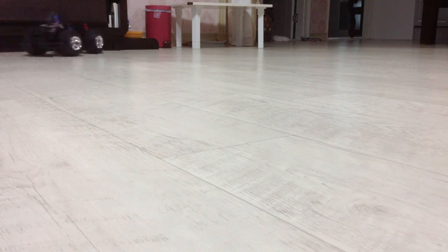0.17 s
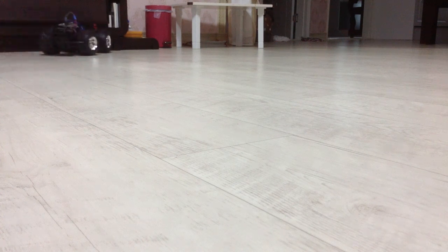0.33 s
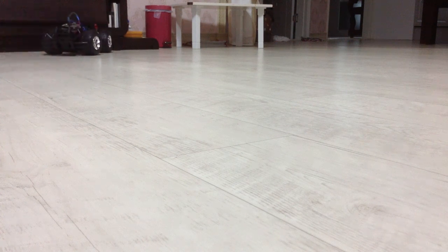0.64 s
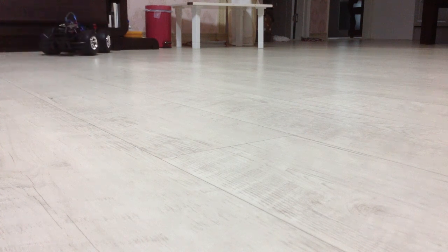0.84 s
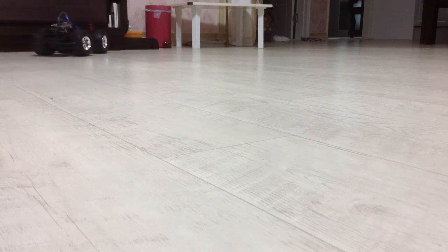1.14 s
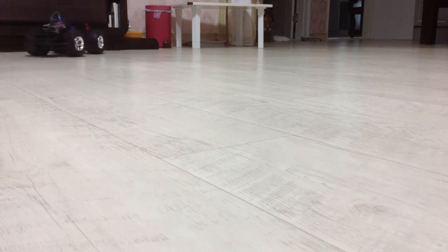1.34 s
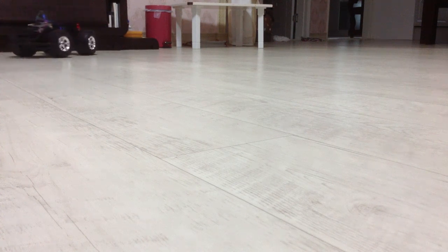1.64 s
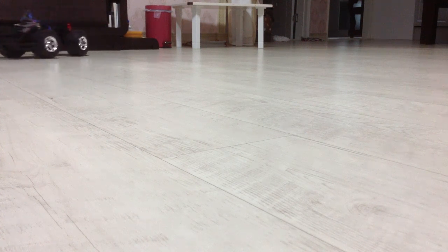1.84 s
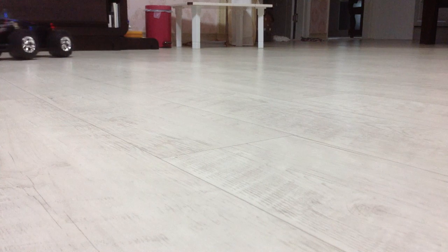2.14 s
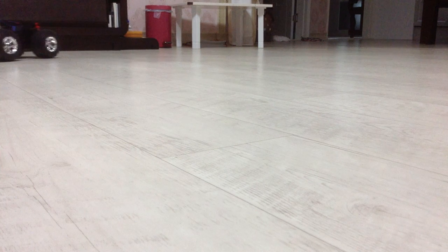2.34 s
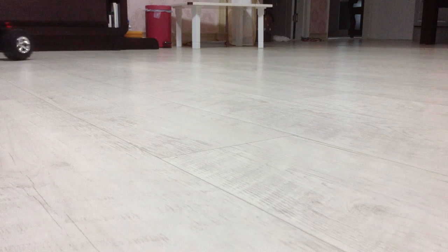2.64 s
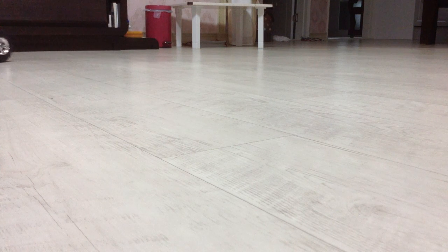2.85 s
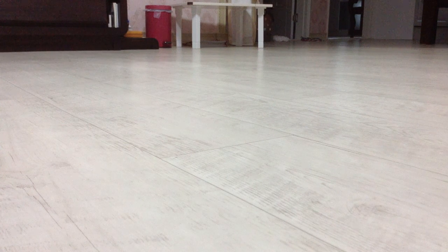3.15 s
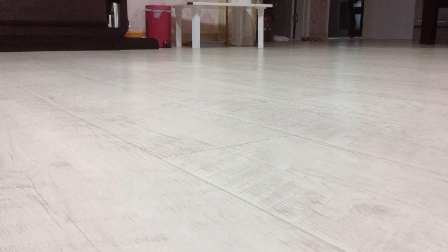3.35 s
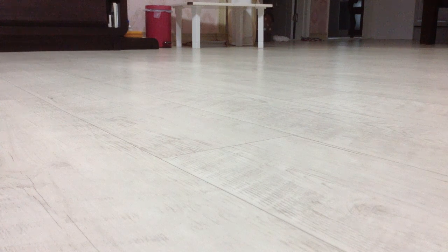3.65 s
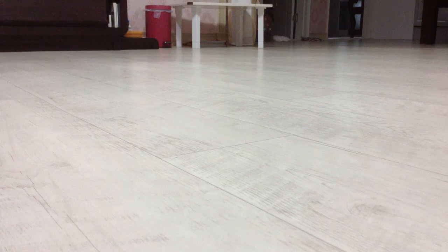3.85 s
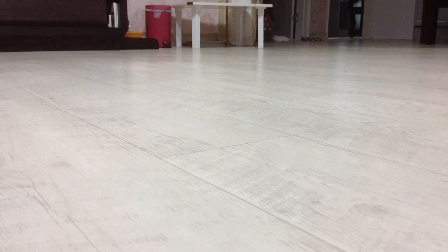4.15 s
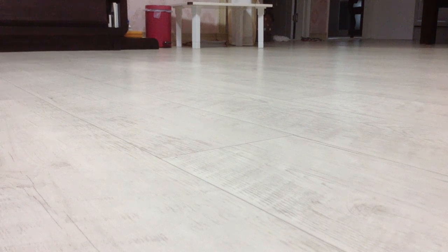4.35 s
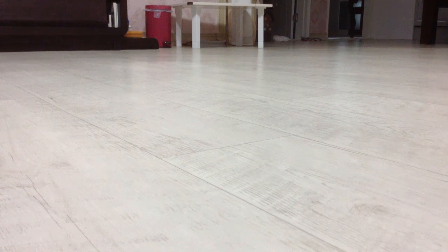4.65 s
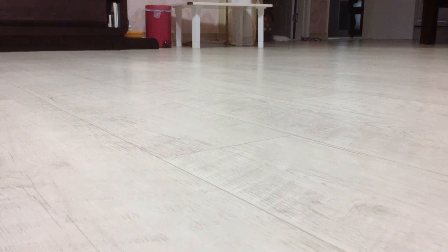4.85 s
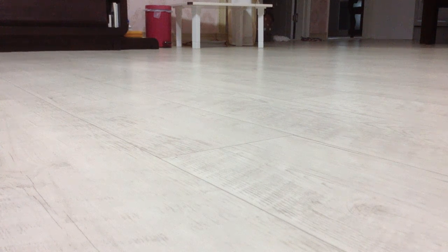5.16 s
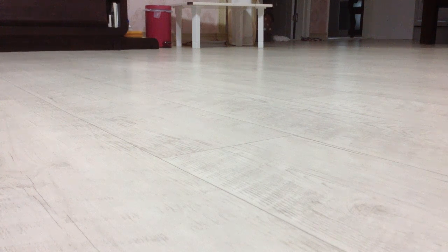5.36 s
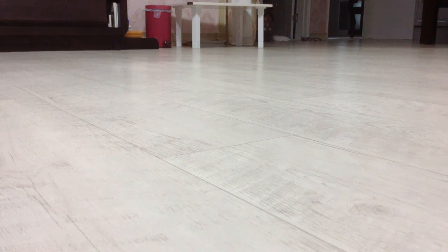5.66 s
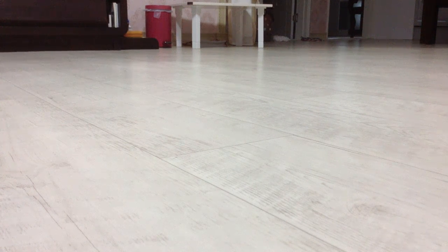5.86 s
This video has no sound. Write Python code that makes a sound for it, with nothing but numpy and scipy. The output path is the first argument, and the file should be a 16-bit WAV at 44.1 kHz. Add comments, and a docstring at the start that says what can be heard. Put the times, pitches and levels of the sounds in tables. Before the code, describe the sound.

Indoors on a hard floor, a little electric motor buzzes, bangs sharply, whirrs slowly upward with ticking gears, clacks to a halt, then faintly creeps.

```python
"""Plastic gears whirr and tick as a small radio-controlled car drives on laminate in a bare living room.
It bumps hard into furniture, jerks, creeps off and speeds up, stops with a clack and creeps off again.
Gears are uneven tooth contacts through resonances and colour filters; whines are wavering sines.
Blows are scattered clicks that ring chassis, shell and panels; soft hum and hiss are coloured noise.
Dense decaying echoes give the room."""
import sys
import numpy as np
from scipy import signal
from scipy.fft import rfft, irfft, next_fast_len
from scipy.io import wavfile

SR = 44100
rng = np.random.default_rng(int(sys.argv[2]) if len(sys.argv) > 2 else 0)


def wav_record(signal):
    """Record a signal, one row per channel, as 16-bit PCM in the file named by sys.argv[1]."""
    frames = np.transpose(np.atleast_2d(signal))
    bounded = np.clip(frames, -1, 1)
    # unit amplitude maps onto the largest positive 16-bit level
    quanta = np.round(bounded * 32767).astype(np.int16)
    wavfile.write(sys.argv[1], SR, quanta)


N = 265041
TIME_S = np.arange(N) / SR

# motor runs: start t/s, end t/s, starting speed/share of full, gain/share per s, extra rasp/dB
MOTOR_RUNS = [(0, 0.31, 0.8, 0.0049, -0.5), (.664, 0.72, .2, 4.57, 14.5), (.72, 4.325, .085, .31, 0),
              (4.98, 7.67, 0.072, .15, 9)]
# motor surges: t/s, extra speed before envelope/share of full, brush flare gain before envelope/dB
MOTOR_SURGES = [(.695, 0.001, -62), (1.253, 0.031, -75), (1.433, 0.031, -61), (1.675, 0.026, -76),
                (1.924, 0.056, -63), (2.28, .02, -58), (2.49, 0.09, -63), (3.16, .15, -48.5),
                (5.1, 0.01, -67), (5.16, 0.01, -65), (5.38, .01, -70), (5.54, 0.052, -66),
                (5.9, 0.029, -65)]
# bumps, rebounds, jolts: t/s, blow gain/dB, hardness low-pass f/Hz, lightness high-pass f/Hz,
# joint scatter/s, struck panel f/Hz, panel clack gain/dB
BLOWS = [(.3070, -26, 3960, 298, 0.00086, 910, -19), (0.3123, -11, 9000, 130, 0.00078, 1930, -19.5),
         (.3150, -10, 3570, 130, 0.0013, 558, -16), (.3265, -16, 1780, 130, 0.00059, 1360, -12.5),
         (.338, -26, 4000, 150, 0.0015, 2260, -21), (0.3797, -30, 1500, 130, 0.00064, 1230, -18.5),
         (.384, -32, 9000, 400, 0.00057, 2870, -26), (.407, -29, 5000, 200, .0007, 2290, -25.5),
         (.423, -31, 700, 130, .001, 550, -29.5), (.6065, -34, 2500, 600, 0.0005, 1320, -44),
         (.611, -35, 2200, 700, 0.0003, 2080, -31.5), (.622, -34.5, 1800, 202, .0007, 1260, -38),
         (.678, -33, 1010, 650, 0.00084, 766, -29), (.7002, -25.5, 1600, 650, 0.00038, 1730, -26.5),
         (.7080, -23.5, 1000, 550, 0.00067, 693, -25.5), (0.7113, -36, 2500, 500, 0.00044, 1530, -28.5),
         (.729, -27.5, 1200, 350, 0.0012, 594, -29.5), (.741, -32.5, 1510, 400, .001, 720, -39),
         (0.768, -40, 1500, 450, 0.0008, 644, -34.5), (.814, -46, 900, 450, 0.00075, 640, -40),
         (4.3448, -31, 3002, 401.8, 0.00035, 2370, -35), (4.3480, -36, 3005, 400, 0.00031, 2200, -31),
         (4.3510, -26.5, 5960, 300, .00025, 4500, -27.5), (4.364, -33.5, 12000, 300, 0.0014, 3420, -47),
         (4.383, -32, 12020, 300, .002, 2800, -45), (4.511, -40.5, 1207, 400.3, .001, 1900, -53)]
# spectrum of rasping teeth: f/Hz, relative level/dB
RASP_SPECTRUM = [(900, -10), (1700, -13.5), (2100, -1.5), (2400, -1.5), (2750, 3), (3150, -4), (3650, 2.5),
                 (4000, -2.5), (4350, -5.5), (4900, -11), (5900, -9), (7200, -16), (9500, -14.5),
                 (14000, -16.5)]

SURGE_ATTACK_S = 0.015  # shared by extra speed and brush flare


def from_db(db):
    """Decibels to amplitude gain."""
    return 10 ** (np.asarray(db) / 20)


def rms_one(x):
    """Scale to unit power."""
    return x / np.sqrt(np.mean(x ** 2) + 1e-20)


def during(start_s, end_s, fade_s):
    """One from start to end, linear fades outside."""
    inside_s = np.minimum(TIME_S - start_s, end_s - TIME_S)
    return np.clip(1 + inside_s / fade_s, 0, 1)


def after(start_s, attack_s, decay_s):
    """Exponential rise from a given moment, times exponential decay."""
    age_s = np.maximum(TIME_S - start_s, 0)
    return (1 - np.exp(-age_s / attack_s)) * np.exp(-age_s / decay_s)


def at_hz(points, hz):
    """Interpolate a table on a log-frequency axis."""
    f, value = np.transpose(points)
    return np.interp(np.log(np.maximum(hz, 1)), np.log(f), value)


def drift(rate_hz):
    """Unit-power random wander, rolled off smoothly above rate_hz."""
    size = next_fast_len(N, True)
    hz = np.fft.rfftfreq(size, 1 / SR)
    spectrum = rfft(rng.standard_normal(size)) / (1 + (hz / rate_hz) ** 2)
    return rms_one(irfft(spectrum, size)[:N])


def low_cut(x, hz, order=2):
    """Butterworth high-pass: take the bass away."""
    sos = signal.butter(order, hz, "high", fs=SR, output="sos")
    return signal.sosfilt(sos, x + 1e-18)


def colour(x, spectrum, size=4096):
    """Causal minimum-phase filter of unit energy with the given spectrum."""
    gain = from_db(at_hz(spectrum, np.fft.rfftfreq(size, 1 / SR)))
    cepstrum = irfft(np.log(gain))
    # fold the cepstrum onto positive time
    cepstrum[1:size // 2] *= 2
    cepstrum[size // 2 + 1:] = 0
    response = irfft(np.exp(rfft(cepstrum)))
    return signal.oaconvolve(x, response / np.linalg.norm(response))[:N]


def resonate(x, modes):
    """A hollow plastic body: parallel resonances of alternating sign."""
    out = 0
    for k, (hz, width_hz, db) in enumerate(modes):
        r = np.exp(-np.pi * width_hz / SR)
        poles = [1, -2 * r * np.cos(2 * np.pi * hz / SR), r * r]
        mode = (1 - r * r) / 2 * signal.lfilter([1, 0, -1], poles, x + 1e-18)
        out = out + (-1) ** k * from_db(db) * mode
    return out


def struck(hz, t60_s):
    """Half a second of one exponentially dying mode."""
    t = np.arange(SR // 2) / SR
    return np.sin(2 * np.pi * hz * t) * np.exp(-np.log(1000) * t / t60_s)


def contact(start_s, scatter_s, count=5):
    """A sharp touch, scattered in time by the joints of the plastic body: an all-pass chain."""
    click = signal.unit_impulse(SR // 10)
    for lag in rng.uniform(.1, 1, count) * scatter_s * SR:
        loop = np.r_[1, np.zeros(int(lag)), .6 * rng.choice([-1, 1])]
        click = signal.lfilter(loop[::-1], loop, click + 1e-18)
    return np.pad(click, (round(start_s * SR), N))[:N]


def teeth(per_s, jitter, uneven_db, rub):
    """Unevenly spaced tooth contacts of uneven force, with sliding noise between; unit power."""
    turns = np.cumsum(per_s * np.exp(jitter * drift(150))) / SR
    contacts = np.diff(np.floor(turns), prepend=0) * rng.choice([-1, 1], N)
    force = from_db(uneven_db * np.clip(rng.standard_normal(N), -2, 2))
    hits = rms_one(contacts * force / np.sqrt(per_s))
    return rms_one(hits + rub * rng.standard_normal(N))


def ambience():
    """Soft hum and hiss of the room: steady coloured noise."""
    # room noise spectrum: f/Hz, relative level/dB
    hum_hiss = [(25, -41), (62, -35), (80, -15), (120, -14), (175, 2), (260, 1.5), (370, -4.5), (700, -4.5),
                (1100, -11.5), (2500, -20.5), (4000, -16), (6200, -14), (9500, -24), (15000, -29)]
    return from_db(-56) * colour(rng.standard_normal(N), hum_hiss)


def reflections(build_s):
    """One second of dense echoes, each band with its own decay, bass shortest; unit energy."""
    # reverberation: f/Hz, t60/s
    decay_times = [(150, 0.26), (600, 0.57), (2000, 0.49), (6000, 0.46), (14000, 0.52)]
    t, hz = np.arange(SR) / SR, np.fft.rfftfreq(SR, 1 / SR)
    white, tail = rfft(rng.standard_normal(SR)), 0
    edges_hz = np.geomspace(40, SR / 2, 10)
    for low, high in zip(edges_hz, edges_hz[1:]):
        t60_s = at_hz(decay_times, np.sqrt(low * high))
        band = irfft(white * (hz >= low) * (hz < high), SR)
        tail = tail + band * np.exp(-np.log(1000) * t / t60_s)
    tail *= 1 - np.exp(-t / build_s)
    return tail / np.linalg.norm(tail)


def room(x, wet_db, build_s=0.0013, shift_hz=14.0, count=5):
    """Direct sound plus reflections whose pattern keeps shifting: a moving mix of echo tails."""
    pace, start = rng.random((2, count, 1))
    shares = np.cos(2 * np.pi * (shift_hz * pace * TIME_S + start))
    shares /= np.linalg.norm(shares, axis=0)
    echoes = sum(signal.oaconvolve(x * share, reflections(build_s))[:N] for share in shares)
    wet = from_db(wet_db)
    return (x + wet * echoes) / np.hypot(1, wet)


def whines(waver=0.006, flutter_db=3.5):
    """Now and then the gears mesh evenly and sing: gliding sines of wavering pitch and level."""
    # gear whines: start t/s, end t/s, initial f/Hz, glide/Hz per s, level before flutter and room/dB
    notes = [(0.094, 0.197, 917, 200, -44), (1.68, 2.02, 1207, 0, -63), (1.679, 2.422, 1363, 20, -57.5),
             (2.467, 2.68, 1368, -120, -54.5), (2.803, 3.025, 1336, 32.5, -53.5),
             (2.599, 2.746, 751.3, -78, -54.5), (2.86, 2.915, 751, -1, -49),
             (3.011, 3.082, 757.3, 0, -46.5), (3.099, 3.203, 771, 600, -57), (3.498, 3.95, 679, -77, -57),
             (4.107, 4.249, 623.2, 0, -50.5)]
    out = 0
    for start_s, end_s, hz, glide, db in notes:
        # the load never stays quite even
        pitch_hz = (hz + glide * (TIME_S - start_s)) * (1 + waver * drift(41.0))
        level = during(start_s, end_s, fade_s=0.039) * from_db(db + flutter_db * drift(43))
        out = out + level * np.sqrt(2) * np.sin(2 * np.pi * np.cumsum(pitch_hz) / SR)
    return out


def ticks(speed, ring_db=33.5, snap_db=-10.0, scatter_s=.0004):
    """Teeth catch and snap free in the housing; stray catches are rarer but stronger at speed."""
    # set catches: t/s, snap gain/dB
    catches = [(1.032, -42.5), (1.064, -41), (1.072, -40), (1.2498, -38.5), (1.3, -49), (1.3967, -42),
               (1.433, -36), (1.441, -35.5), (1.6693, -37), (1.685, -36), (1.719, -37), (1.7426, -37),
               (1.799, -43), (1.8933, -35), (1.923, -38), (1.95, -34), (1.9956, -34.5), (2.0677, -34),
               (2.118, -35), (2.2784, -36), (2.3262, -34), (2.469, -33), (2.4887, -33), (5.062, -57),
               (5.167, -48), (5.3832, -49), (5.5461, -48), (5.5992, -49), (5.6759, -44), (5.7364, -51),
               (5.797, -42), (5.815, -41), (5.8836, -47), (5.924, -40)]
    # ring of a catching tooth: f/Hz, width/Hz, gain/dB
    tooth_modes = [(780, 150, -14), (1187, 73, 0), (1460, 118, -1)]
    caught = rng.random(N) < 18 * (1 - speed) / SR  # up to 18 per s
    snap = contact(0, scatter_s)[:SR // 10]
    stray = signal.oaconvolve(caught * speed * from_db(-40.5), snap)[:N]
    snaps = stray + sum(from_db(db) * contact(s, scatter_s) for s, db in catches)
    ringing = from_db(ring_db) * resonate(snaps, tooth_modes)
    return ringing + from_db(snap_db) * colour(snaps, RASP_SPECTRUM)


def clacks(t60_s=0.024, attack_s=0.00073):
    """Each blow clacks one quickly damped panel of the thin body shell: a short swelling mode."""
    swell = 1 - np.exp(-np.arange(SR // 2) / SR / attack_s)
    out = 0
    for start_s, _, _, _, scatter_s, hz, db in BLOWS:
        panel = swell * struck(hz, t60_s)
        out = out + from_db(db) * signal.oaconvolve(contact(start_s, scatter_s), panel)[:N]
    return out


def rattle(blows, per_s, settle_s):
    """Loose parts keep tapping at random while the jolt of each blow dies away."""
    keep = np.exp(-2 / (settle_s * SR))
    energy = signal.lfilter([1 - keep], [1, -keep], blows ** 2 + 1e-18)
    taps = (rng.random(N) < per_s / SR) * rng.standard_normal(N)
    return taps * np.sqrt(energy * SR / per_s)


def knocks(crack_db=18.5, ring_db=-10.5, shell_db=16.0, rattle_db=-2.5, rattle_low_hz=380):
    """Blows crack and ring chassis and shell; soft contacts are dull, light ones lack thump."""
    # chassis modes: f/Hz, relative gain/dB, t60/s
    chassis_modes = [(165, -4, 0.16), (214, -4.5, 0.36), (420, -25, 0.13), (543, 5, 0.22), (589, 2.5, 0.3),
                     (714, -4, 0.22), (845.6, 4, 0.21), (1260, 6, 0.21), (1270, 3, 0.16), (1420, -10, 0.06),
                     (2090, 5, .1)]
    # body shell resonances: f/Hz, width/Hz, gain/dB
    shell_modes = [(2230, 44, -2), (2800, 100, -7), (3540, 50, -6), (5130, 69, -2), (6770, 220, -2),
                   (8250, 80, -31), (8700, 100, -8)]
    # impact spectrum: f/Hz, relative level/dB
    crack_spectrum = [(70, -55), (130, -26), (168, 7), (240, -2.5), (320, -6.5), (450, -3), (560, 6.5),
                      (720, 4.5), (1000, -5), (1350, 5), (1700, -1), (2500, 0), (7500, -3.5), (10000, -7),
                      (15000, -15.5)]
    blows = 0
    for start_s, db, hard_hz, low_hz, scatter_s, _, _ in BLOWS:
        soft = np.exp(-2 * np.pi * hard_hz / SR)
        touch = signal.lfilter([1 - soft], [1, -soft], contact(start_s, scatter_s) + 1e-18)
        blows = blows + from_db(db) * low_cut(touch, low_hz)
    loose = low_cut(rattle(blows, per_s=1800, settle_s=0.048), rattle_low_hz)
    blows = blows + from_db(rattle_db) * loose
    modes = sum(from_db(db) * struck(hz, t60_s) for hz, db, t60_s in chassis_modes)
    ringing = signal.oaconvolve(blows, modes / np.abs(modes).max())[:N]
    crack = from_db(crack_db) * colour(blows, crack_spectrum)
    shell = from_db(shell_db) * resonate(blows, shell_modes)
    return crack + from_db(ring_db) * ringing + shell


def dash():
    """The motor pulls hard: loaded gears buzz in a few resonances of their own."""
    # hard pulls: start t/s, end t/s, buzz level before room/dB
    pulls = [(0, 0.307, -43.5), (0.677, 0.713, -44.5)]
    # resonances under load: f/Hz, width/Hz, relative gain/dB
    load_modes = [(587, 31, 0), (1120, 350, -3.5), (1560, 76, 2), (2660, 420, -7), (3590, 230, -12.5),
                  (6060, 990, -23)]
    mesh = teeth(np.full(N, 600.), jitter=0.13, uneven_db=-1.0, rub=0.38)
    level = sum(from_db(db) * during(start, end, fade_s=0.0044) for start, end, db in pulls)
    return level * rms_one(resonate(mesh, load_modes))


def motion(coast_s=.08, surge_s=.25):
    """Speed/share of full: linear climb in each run, exponential coast after it, surges added."""
    speed = 1e-3
    for start_s, end_s, first, gain_per_s, _ in MOTOR_RUNS:
        driven = np.clip(first + gain_per_s * (np.minimum(TIME_S, end_s) - start_s), 0, 1)
        coast = np.exp(-np.maximum(TIME_S - end_s, 0) / coast_s)
        speed = np.maximum(speed, (TIME_S >= start_s) * driven * coast)
    return speed + sum(extra * after(s, SURGE_ATTACK_S, surge_s) for s, extra, _ in MOTOR_SURGES)


def at_speed(speed, full_db, per_decade_db):
    """Gain growing with a power of speed: dB at full speed, dB lost at a tenth of it."""
    return from_db(full_db + per_decade_db * np.log10(speed))


def run_rasp():
    """The teeth mesh more harshly in some runs: rasp gain, held until the next run."""
    db = 0
    for start_s, _, _, _, rasp_db in MOTOR_RUNS:
        db = np.where(TIME_S >= start_s, rasp_db, db)
    return from_db(db)


def tread(lugs_per_s, sharpness, uneven):
    """Each tyre lug meets the floor with a jolt that decays until the next; unit power."""
    turns = np.cumsum(lugs_per_s * np.exp(uneven * drift(20))) / SR
    return rms_one(np.exp(-sharpness * (turns % 1)))


def drive(speed):
    """Gears ring the housing or shake the whole car in timed shares; teeth rasp, brushes fizz."""
    # whirr ringing in the housing, rest shakes the car: t/s, power share/0-1
    housing_curve = [(1.1, 0.5), (1.7, 1), (3.0, 0.46), (3.3, 0.01), (5.3, 0.11), (5.7, 0.5)]
    # gearbox resonances: f/Hz, width/Hz, relative gain/dB
    gearbox_modes = [(583, 210, -4), (823, 280, -0.5), (1187, 68, 1), (1376, 160, 0), (2150, 440, -17)]
    # whole-car whirr spectrum: f/Hz, relative level/dB
    whirr_spectrum = [(250, -35), (430, -20.5), (530, -7), (640, -0.5), (800, -5), (980, -1), (1100, -4),
                      (1250, -1.5), (1580, -5), (1800, -10.5), (2400, -17), (5000, -44.5)]
    # brush fizz spectrum: f/Hz, relative level/dB
    fizz_spectrum = [(3000, -2), (5000, -10.5), (7000, -3), (10000, -13), (11500, 1), (13500, 1),
                     (14700, 5.5), (15500, -13.5)]
    per_s = 900 * speed  # mean tooth contacts
    mesh = teeth(per_s, jitter=.25, uneven_db=1.5, rub=1.0)
    shake = teeth(per_s, jitter=.25, uneven_db=2.5, rub=0.33)
    sparks = teeth(3 * per_s, jitter=0.34, uneven_db=9.0, rub=1.0)
    jolts = tread(per_s / 7, sharpness=0.94, uneven=.15)

    share = np.interp(TIME_S, *np.transpose(housing_curve))
    housing = rms_one(resonate(mesh * jolts, gearbox_modes))
    car_body = colour(shake * np.sqrt(jolts), whirr_spectrum)
    body = np.sqrt(share) * housing + np.sqrt(1 - share) * car_body
    whirr = at_speed(speed, full_db=-43.5, per_decade_db=20.8) * body

    # the rush of current in a surge is brief and also makes the teeth rasp
    flare = sum(from_db(db) * after(s, SURGE_ATTACK_S, decay_s=0.026) for s, _, db in MOTOR_SURGES)
    run_level = at_speed(speed, full_db=-46, per_decade_db=40) * run_rasp()
    rasp_level = np.hypot(run_level, from_db(12.5) * flare)
    rasp = rasp_level * colour(mesh * np.sqrt(jolts), RASP_SPECTRUM)
    fizz_level = np.hypot(at_speed(speed, full_db=-52, per_decade_db=42), flare)
    fizz = fizz_level * colour(sparks, fizz_spectrum)

    # out-of-round gears bind and loosen, most when slow
    binding = from_db((3.0 - 2.74 * speed) * drift(28))
    # teeth rattle in their slack, less at speed
    chatter = from_db((2.9 - 1.0 * speed) * drift(34))
    sparking = from_db(2.4 * drift(9.7))  # brushes spark unevenly
    return binding * (whirr + chatter * rasp) + sparking * fizz


def scene():
    """Car a few metres off: gears and knocks about as loud in the room as direct, the rest drier."""
    speed = motion()
    car = room(drive(speed) + dash(), wet_db=-1.5)
    car = car + room(knocks(), wet_db=0.0)
    car = car + room(whines(), wet_db=-8.0, shift_hz=7.0)
    car = car + room(ticks(speed) + clacks(), wet_db=-6.5)
    car = low_cut(car, 145, order=4)  # so small a body radiates no bass
    return (car + ambience())[None, :]


def record(dry):
    """Steep elliptic low-pass at 15450 Hz."""
    return signal.sosfilt(signal.ellip(12, .2, 80, 15450, fs=SR, output="sos"), dry)


dry = scene()
out = record(dry)
wav_record(out)
```